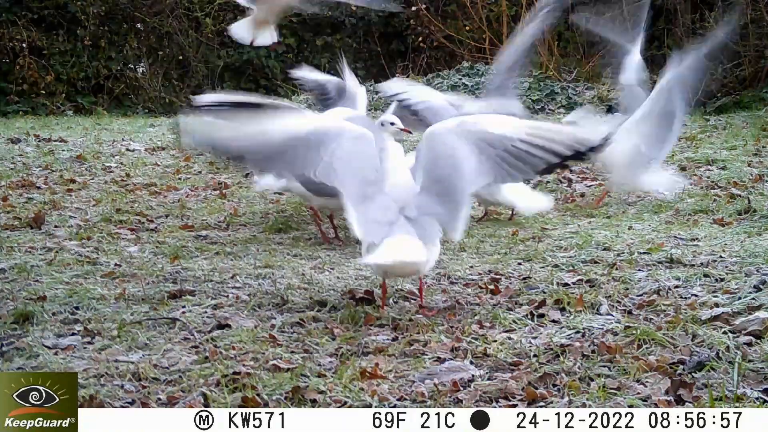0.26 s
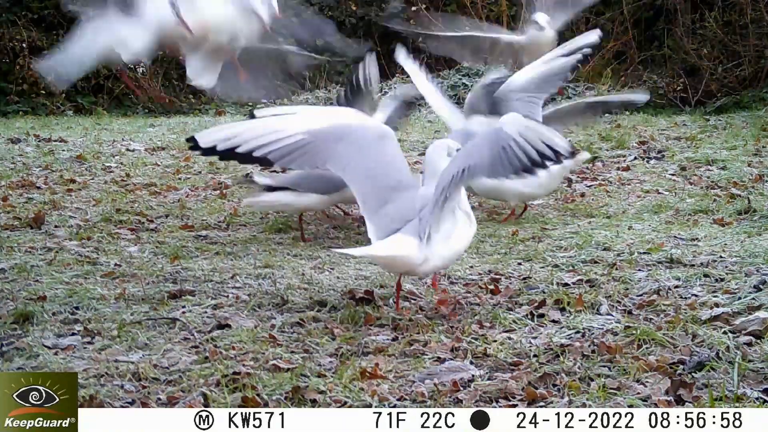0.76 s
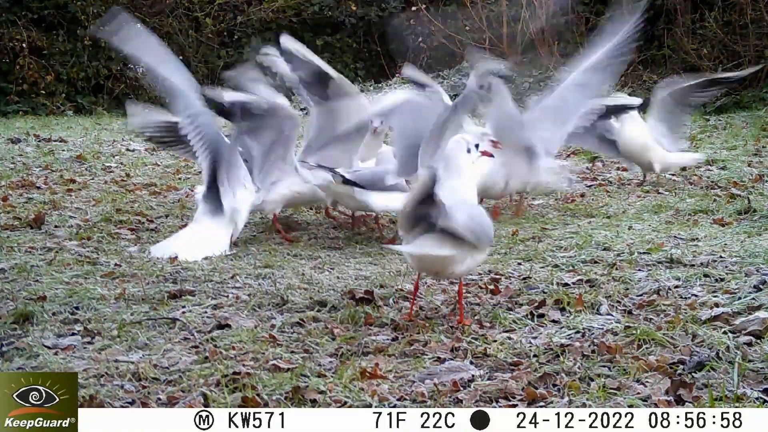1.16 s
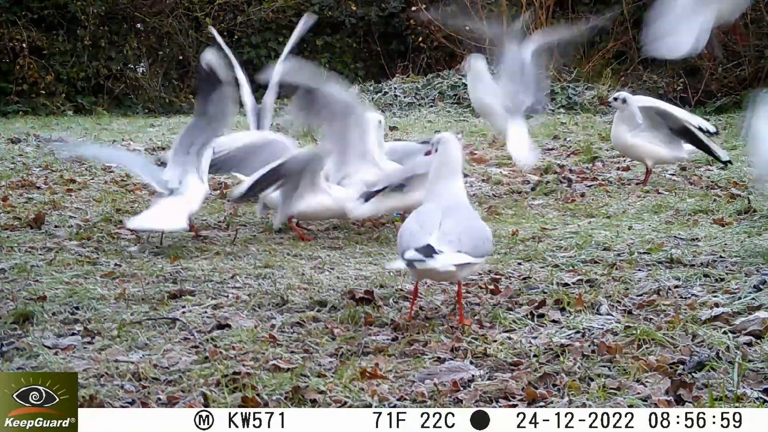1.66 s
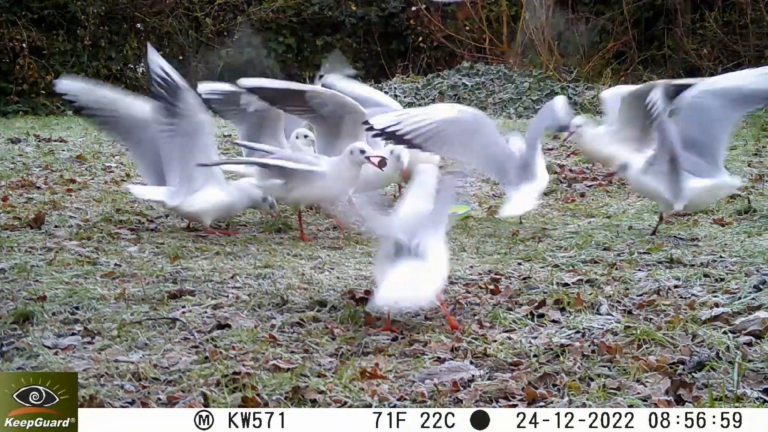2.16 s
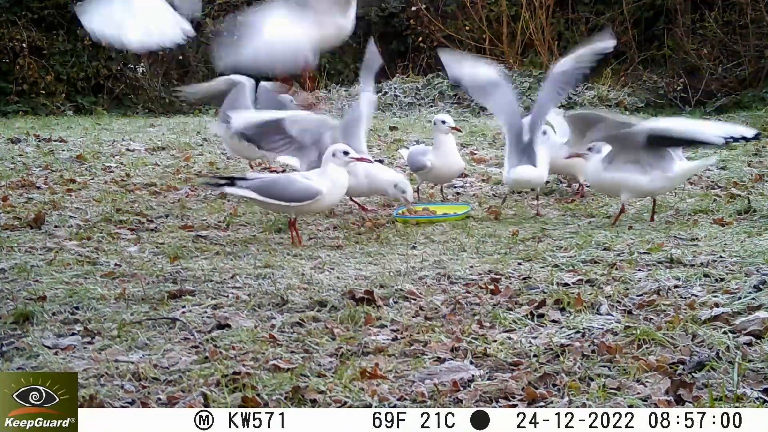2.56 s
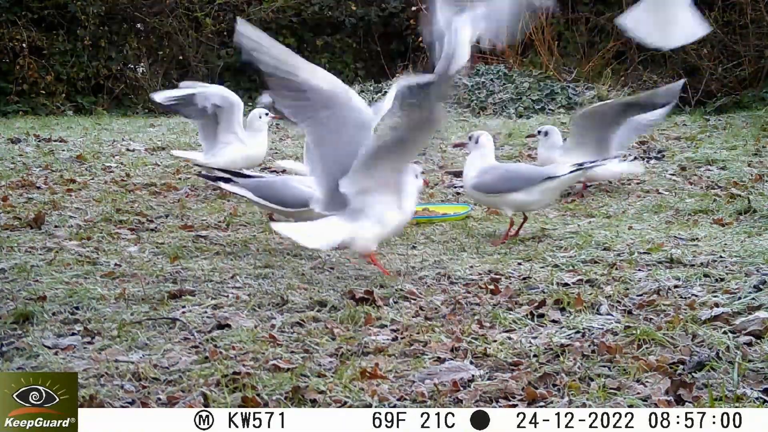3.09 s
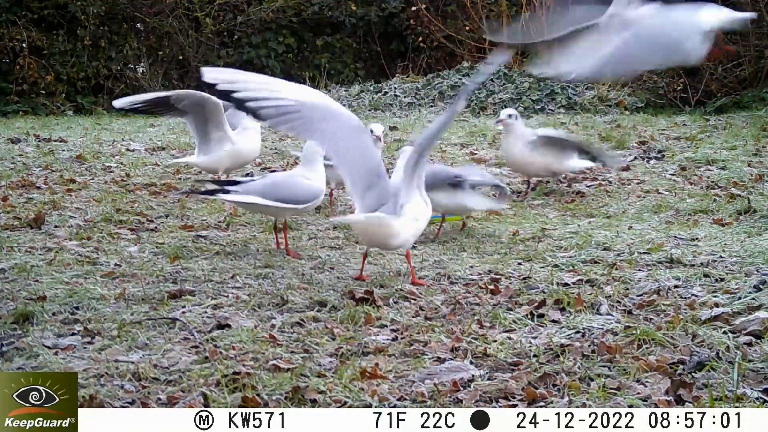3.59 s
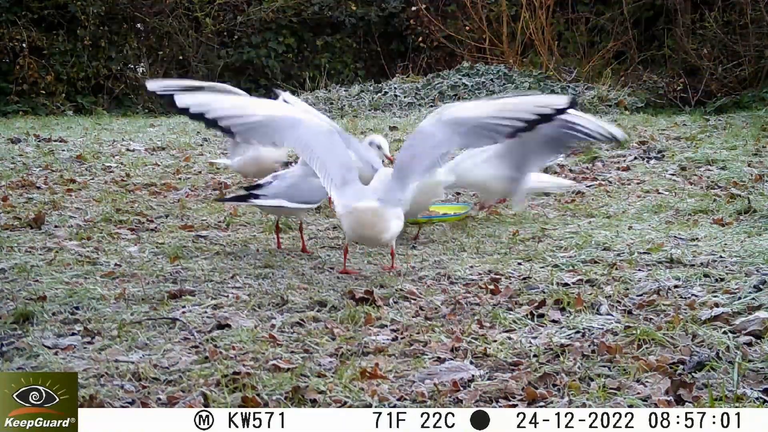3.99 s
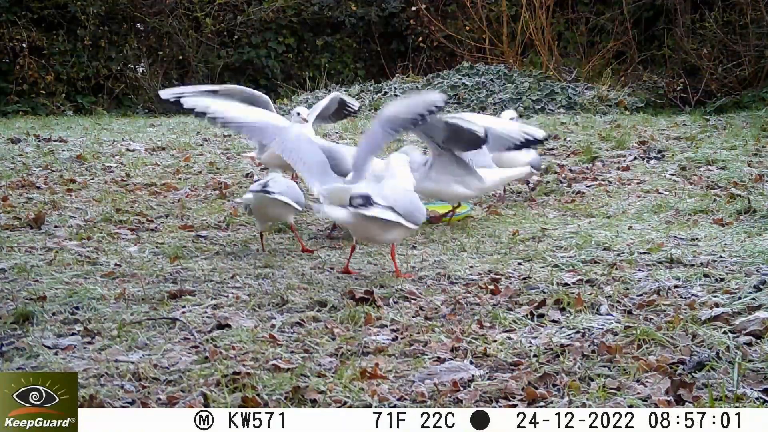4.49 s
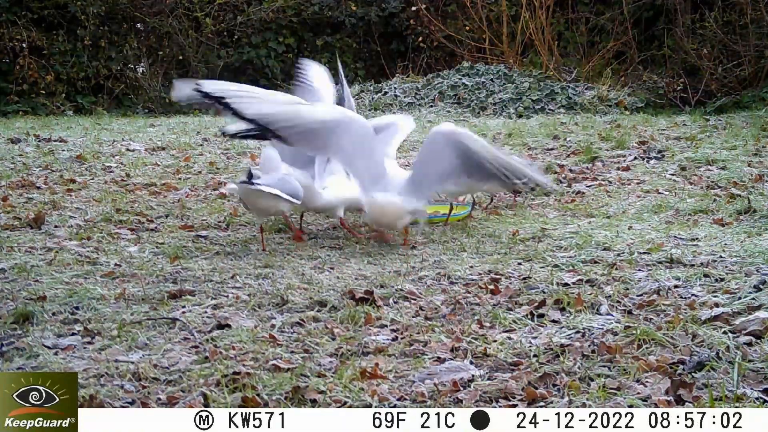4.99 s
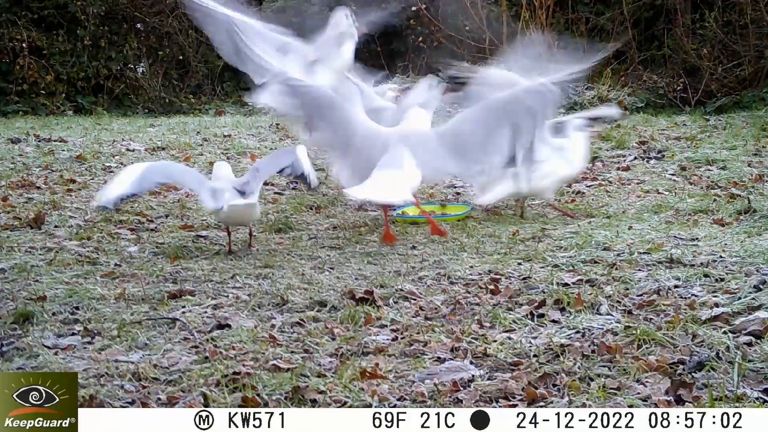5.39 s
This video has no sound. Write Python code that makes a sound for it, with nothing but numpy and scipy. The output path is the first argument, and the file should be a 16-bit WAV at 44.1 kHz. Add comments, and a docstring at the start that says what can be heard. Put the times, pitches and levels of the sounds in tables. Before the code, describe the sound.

Gulls jostle and flap close by, giving short rasping cries and nasal clucks amid wing claps and low gusts of air.

```python
"""Gulls at a food dish

Gulls jostle on a frosty lawn, a few steps from a small camera. Pulses and breath from the syrinx ring
through the bill as short rasping cries and lower nasal clucks; one bird whistles and one squeals.
Wings clap, swish and push air at the microphone, feet stir dead leaves, and a hedge answers faintly."""
import sys
import numpy as np
from scipy import signal
from scipy.fft import rfft, irfft, next_fast_len
from scipy.io import wavfile
from scipy.ndimage import map_coordinates

SR = 44100
rng = np.random.default_rng(int(sys.argv[2]) if len(sys.argv) > 2 else 0)


def unload_wav(signal):
    """Save mono or channel-first audio to the path in sys.argv[1] as 16-bit WAV at rate SR, clipped to [-1, 1]."""
    wavfile.write(
        sys.argv[1],
        SR,
        np.round(np.clip(np.atleast_2d(signal).T, -1, 1) * 32767).astype(np.int16),
    )


N = 249165
TOP_HZ = 7850  # band limit of the voices' harmonics and of the camera

# How busy the flock is. Each row: time in seconds, activity level in dB.
FLOCK_ACTIVITY = [(0.0, -44), (0.22, -52.5), (0.49, -51.5), (0.97, -45), (1.43, -45), (1.59, -47),
                  (1.79, -41), (2.22, -48), (2.42, -46.5), (2.8, -50.5), (3.15, -43.5), (3.45, -53),
                  (4.04, -56.5), (4.26, -53), (4.72, -59), (5.04, -57.5), (5.65, -46.5)]
# The soft wash of moving wings. Each row: frequency in Hz, relative level in dB.
SWISH_COLOUR = [(60, -10), (130, 6), (250, 1), (400, -3), (650, -4.5), (1100, -12), (2000, -27.5),
                (4000, -31.5), (8000, -31.5)]
# The crackle of feathers and dead leaves. Each row: frequency in Hz, relative level in dB.
RUSTLE_COLOUR = [(300, -33.5), (1200, 6.5), (2000, -1), (3500, -6), (5000, -13.5), (7500, -14)]
# Draught at the microphone, strong while birds flap close. Each row: time in seconds, level in dB.
DRAUGHT_LEVEL = [(0, -21.5), (.38, -25.5), (.56, -17.5), (.9, -28.5), (1.4, -33), (1.62, -25.5), (2.1, -32),
                 (2.47, -22.5), (2.9, -29), (3.45, -29.5), (3.7, -36.5), (4.2, -37), (4.6, -28.5),
                 (4.85, -34), (5.35, -28.5), (5.65, -24)]
# The draught's deep rumble. Each row: frequency in Hz, relative level in dB.
DRAUGHT_COLOUR = [(3, -38.5), (10, -2), (18, 8.5), (30, -13.5), (50, -13.5), (80, -20.5), (130, -36.5),
                  (300, -42), (800, -100)]
# Thumps from close downstrokes. Each row: centre in seconds, peak in dB, half length in seconds.
DOWNSTROKES = [(0.547, -12, 0.0048), (1.638, -20, 0.0086), (2.488, -20, 0.011), (2.671, -17.5, 0.014),
               (5.078, -26.5, 0.01), (5.302, -28, 0.01)]
# The featured wing strokes. Each row: centre in seconds, level in dB, pitch of the swish in Hz.
LOUD_STROKES = [(.015, -45.5, 488), (.115, -38, 765), (.408, -48, 820), (1.05, -42, 604),
                (1.195, -42.5, 503), (1.415, -42, 610), (1.497, -33.5, 1050), (1.738, -40, 444),
                (1.806, -36.5, 273), (1.822, -34, 846), (1.958, -39, 670), (2.132, -41, 710),
                (2.234, -41, 570), (2.341, -35, 604), (2.458, -38, 734), (2.531, -37.5, 586),
                (2.635, -41, 620), (3.092, -46.5, 246), (3.336, -43.5, 647), (4.443, -49.5, 805),
                (5.23, -49.5, 545), (5.302, -49.5, 388), (5.467, -46.5, 550)]
# Harsh cries. Each row: centre in seconds, half length in seconds, top pitch in Hz, rasp from 0 to 1,
# breath from 0 to 1, then the relative levels of the three lower formants in dB.
HARSH_CRIES = [(.137, 0.022, 848, 0.58, 0.24, -43.5, -32, -39),
               (.477, 0.016, 1008, 0.52, 0.062, -32, -33.5, -17.5),
               (.563, 0.023, 930, 0.33, 0.98, -39.5, -32.5, -36),
               (.871, 0.033, 991, 0.62, 0.57, -32, -25.5, -30.5),
               (1.105, 0.025, 909, 0.46, 0.93, -31.5, -36.5, -35.5),
               (1.232, 0.013, 1058, 0.61, 0.25, -28.5, -23.5, -31.5),
               (1.322, 0.018, 935, 0.34, 0.306, -31, -29, -30),
               (1.449, .027, 725, 0.58, 0.24, -30, -31, -40),
               (1.765, 0.035, 893, .75, 0.57, -33, -25.5, -33),
               (2.318, 0.023, 1002, 0.93, 0.34, -31, -26, -28),
               (2.559, 0.029, 891, 0.39, 0.91, -33, -30, -33),
               (2.828, .034, 783, .64, 0.7, -33.5, -33, -33),
               (3.208, 0.024, 729, 0.82, 0.29, -35.5, -31.5, -36),
               (3.856, 0.025, 592.5, 0.77, 0.55, -42, -45, -47.5),
               (4.329, 0.017, 697, 0.32, 0.43, -39, -42, -44),
               (5.005, 0.026, 848, 0.65, .9, -34.5, -38, -44),
               (5.041, 0.018, 420, .65, 1, -39.5, -39.5, -41.5),
               (5.546, 0.02, 903.6, 0.35, 0.73, -33.5, -30.5, -32)]
# Formants with the bill wide open. Each row: lower edge in Hz, upper edge in Hz.
OPEN_BILL = [(780, 1316), (1480, 1916), (2620, 3610), (6300, 7650)]
# Wing claps. Each row: start in seconds, level of the first 10 ms in dB, treble in dB (-14 is neutral).
WING_CLAPS = [(0.1886, -40, -12.5), (0.259, -44.5, -10.5), (0.593, -33.5, -13.5), (0.798, -36.5, -6.5),
              (0.8183, -36, -12), (1.001, -34, -9), (1.054, -35.5, -11), (1.5689, -29.5, -10.5),
              (2.4999, -39, -7), (2.7769, -36.5, -12.5), (2.895, -48, -3), (3.6738, -41.5, -6),
              (3.9679, -36, -6.5), (4.5565, -52.5, -4), (4.7794, -39.5, -11.5), (5.1402, -31, -20),
              (5.3892, -44.5, 0), (5.4632, -47, -7), (5.6039, -37.5, -12)]
# The body of a clap. Each row: frequency in Hz, relative level in dB.
WING_CLAP_COLOUR = [(60, -18.5), (250, -2.5), (500, 5), (1400, 5), (2500, -3.5), (4200, -17), (8000, -23.5)]
# The whistle's nearly flat line. Each row: time in seconds, pitch in Hz, level in dB.
WHISTLE_LINE = [(.99, 1430, -87), (1.02, 1450, -50), (1.07, 1436, -54), (1.1, 1485, -43.5),
                (1.15, 1440, -35.5), (1.17, 1430, -68)]
# The whistle's tone at its loudest. Each row: harmonic number, relative level in dB.
WHISTLE_HARMONICS = [(1, 0), (2, -14)]
# Nasal clucks. Each row: centre in seconds, half length in seconds, top pitch in Hz, rasp from 0 to 1,
# then the relative levels of the three formants in dB.
NASAL_CLUCKS = [(1.25, 0.013, 399.4, 0.47, -23, -38, -36.5), (1.379, 0.019, 392.4, .2, -24.5, -34.5, -44),
                (1.447, 0.03, 381.6, 0.41, -33, -53, -38.5), (1.935, 0.019, 348, .15, -35, -35, -53),
                (2.086, 0.015, 349.4, 0.08, -31.5, -36.5, -42.5),
                (2.996, 0.022, 381.5, .11, -28, -27, -41.5), (3.155, 0.022, 340, 0.24, -32, -31.5, -48),
                (3.284, .018, 360, 0.11, -27, -29.5, -32.5), (4.113, 0.016, 393, 0.71, -30, -35, -44),
                (4.228, 0.022, 387.7, 0.17, -26.5, -27.5, -34.5)]
# Formants with the bill nearly shut. Each row: lower edge in Hz, upper edge in Hz.
NARROW_BILL = [(940, 1293), (1400, 2040), (2740, 3195)]
# The squeal's arch. Each row: time in seconds, pitch in Hz, relative level in dB.
SQUEAL_LINE = [(3.095, 1530, -61), (3.14, 1700, -49), (3.16, 1752, -44), (3.195, 1757, -39),
               (3.22, 1738, -41), (3.25, 1695, -46), (3.28, 1630, -44), (3.303, 1545, -47),
               (3.325, 1420, -60)]
# The squeal's tone at its loudest. Each row: harmonic number, relative level in dB.
SQUEAL_HARMONICS = [(1, -16), (2, -1.5), (3, -6), (4, 4.5)]
# The tail from lawn and hedge. Each row: frequency in Hz, time to fall 60 dB in seconds.
HEDGE_DECAY = [(200, 0.37), (1500, 0.32), (7000, 0.24)]
# The notch of the camera's housing. Each row: frequency in Hz, gain in dB.
HOUSING_NOTCH = [(4200, 1.5), (4800, -4), (5600, -11), (6400, -1), (7100, 1)]


def amp(db):
    """Decibels to gain."""
    return 10 ** (np.asarray(db) / 20)


def unit(x):
    """x at rms 1."""
    return x / np.sqrt(np.mean(x ** 2) + 1e-20)


def along(points, hz):
    """Read (Hz, value) points on a log frequency axis."""
    freqs, values = np.transpose(points)
    return np.interp(np.log(hz + 1), np.log(freqs + 1), values)


def curves(rows):
    """One automation curve for each column after the time."""
    times, *columns = np.transpose(rows)
    return [np.interp(np.arange(N) / SR, times, column) for column in columns]


def wobble(rate, size=N):
    """A smooth random curve with rate knots a second."""
    return map_coordinates(rng.standard_normal(size + 4), [np.arange(size) * rate / SR])


def bandpass(x, edges_hz):
    """The band of x between two edges."""
    return signal.sosfilt(signal.butter(2, edges_hz, "bandpass", fs=SR, output="sos"), x)


def filtered(x, gain):
    """Equalise x with a gain over frequency."""
    size = next_fast_len(N + SR // 2)
    return irfft(rfft(x, size) * gain(np.fft.rfftfreq(size, 1 / SR)), size)[:N]


def noise(colour):
    """Coloured noise at rms 1."""
    return unit(filtered(rng.standard_normal(N), lambda hz: amp(along(colour, hz))))


def minimum_phase(gains):
    """The front-loaded impulse response of a gain spectrum."""
    cepstrum = irfft(np.log(gains))
    middle = len(cepstrum) // 2
    cepstrum[1:middle] *= 2
    cepstrum[middle + 1:] = 0
    return irfft(np.exp(rfft(cepstrum)))


def add(track, start_s, x):
    """Mix x into the track from start_s."""
    i = round(start_s * SR)
    x, i = x[max(-i, 0):], max(i, 0)
    track[i:i + len(x)] += x[:max(len(track) - i, 0)]


def flock_bed(swish_db=-1, rustle_db=-4.5, busy_db=-50, rustle_growth=0.58):
    """Wings stir the air; the busier the flock, the more feathers and dead leaves rustle in grains."""
    activity_db, = curves(FLOCK_ACTIVITY)
    swish = unit(noise(SWISH_COLOUR) * amp(2 * wobble(60)))
    rustle = unit(noise(RUSTLE_COLOUR) * amp(3 * wobble(500) + 3 * wobble(25)))  # grains and scuffles
    rustle_ride_db = busy_db + rustle_growth * (activity_db - busy_db)
    return amp(activity_db + swish_db) * swish + amp(rustle_ride_db + rustle_db) * rustle


def draught(surge_db=2, surges_per_s=14):
    """Air thrown by the wings buffets the microphone in surges; close strokes land as single thumps."""
    level_db, = curves(DRAUGHT_LEVEL)
    out = amp(level_db) * unit(noise(DRAUGHT_COLOUR) * amp(surge_db * wobble(surges_per_s)))
    for centre, db, half in DOWNSTROKES:
        u = (np.arange(N) / SR - centre) / half
        out += amp(db) * (1 - 2 * u ** 2) * np.exp(-u ** 2)
    return out


def soft_strokes(per_s=6, over_flock_db=4, usual_hz=570, pitch_scatter=0.25):
    """Rows for the filler wing strokes, unevenly spaced and as strong as the flock is busy."""
    slots = np.arange(0, N / SR, 1 / per_s)
    late, scatter_db, speed = rng.uniform(-1, 1, (len(slots), 3)).T
    times = slots + abs(late) / per_s
    levels = np.interp(times, *np.transpose(FLOCK_ACTIVITY)) + over_flock_db + scatter_db
    return list(zip(times, levels, usual_hz * np.exp(pitch_scatter * speed)))


def wing_strokes(swell_cycles=6.8, spread=1.36, feather_db=-11, feather_hz=(900, 3000)):
    """A passing wing sheds eddies in a broad band, with a brush of feathers on top."""
    out, t = np.zeros(N), np.arange(-SR // 14, SR // 14) / SR
    for centre, db, hz in list(LOUD_STROKES) + soft_strokes():
        swell = np.exp(-(t * hz / swell_cycles) ** 2 / 2)  # a fast wing is higher and briefer
        eddies = unit(bandpass(rng.standard_normal(len(t)), [hz / spread, hz * spread]))
        feathers = unit(bandpass(rng.standard_normal(len(t)), feather_hz))
        swish = swell * (eddies + amp(feather_db) * feathers)
        add(out, centre + t[0], amp(db) * swish * np.linalg.norm(swell) / np.linalg.norm(swish))
    return out


def syrinx(pitch, effort, rasp, breath, rasp_hz, jitter, waver, rolloff):
    """The gull's voice: pulses and breath, chopped and bent into a rasp by an uneven flutter."""
    size = len(pitch)
    flutter_hz = rasp_hz * (1 + 0.25 * wobble(110, size))
    flutter = np.cos(2 * np.pi * (np.cumsum(flutter_hz) / SR + rng.random()))
    # at low pressure, at both ends of a call, the membranes lose their regular beat
    unsteady = waver + jitter * rasp * (1 + 1.62 * (1 - effort))
    pitch = pitch * np.exp(unsteady * wobble(606, size) + 0.034 * rasp * flutter)
    phase = 2 * np.pi * np.cumsum(pitch) / SR
    k = np.arange(1, 25)[:, None]
    pulses = np.sum(np.cos(k * phase) * (k * pitch < TOP_HZ) / k ** rolloff, axis=0)
    shimmer_db = 4 * rasp * wobble(801.3, size)
    pulses = unit(pulses * amp(shimmer_db))
    # turbulent air escapes in uneven spurts
    hiss = unit(rng.standard_normal(size) * (1 + np.cos(phase)) * amp(3 * wobble(604, size)))
    chop = 1 + 0.71 * rasp * flutter
    return (np.sqrt(1 - breath) * pulses + np.sqrt(breath) * hiss) * chop


def calls(rows, formants, trim_db, steepness, upper_squeeze, climb_s, sag_s, fade_ratio, **voice):
    """The syrinx rings the formants of throat and bill; pitch and loudness arch together."""
    out, t = np.zeros(N), np.arange(-SR // 14, SR // 14) / SR
    for centre, half, top_hz, rasp, breath, *levels in rows:
        effort = np.exp(-np.abs(t / np.where(t < 0, half, fade_ratio * half)) ** steepness)
        # an octave down at climb_s before the top and at sag_s after it
        pitch = top_hz / (1 + (t / np.where(t < 0, climb_s, sag_s)) ** 2)
        source = syrinx(pitch, effort, rasp, breath, **voice)
        for k, (band, db) in enumerate(zip(formants, levels)):
            # the upper formants need more effort to speak
            formant = bandpass(source, band) * effort ** (upper_squeeze ** (k - 1))
            formant *= np.linalg.norm(effort) / np.linalg.norm(formant)
            add(out, centre + t[0], amp(db + trim_db) * formant)
    return out


def cries(bite_db=-45.5, loud_db=-26, bite_growth=1.63):
    """Rasping cries through a wide open bill; the harder the cry, the more a fourth formant bites."""
    # the fourth formant's level follows the second's
    rows = [(*row, bite_db + bite_growth * (row[-2] - loud_db)) for row in HARSH_CRIES]
    return calls(rows, OPEN_BILL, trim_db=-3, steepness=2.16, upper_squeeze=1.16,
                 climb_s=0.047, sag_s=0.05, fade_ratio=0.96,
                 rasp_hz=91.27, jitter=0.04, waver=0.0062, rolloff=0.11)


def wing_claps(feather_gain=0.055, rise_s=0.00033, t60_s=0.072, neutral_treble_db=-14):
    """One wing hits another: a pressure snap, then the feathers clatter shut."""
    out, t = np.zeros(N), np.arange(SR // 10) / SR
    hz = np.fft.rfftfreq(2048, 1 / SR)
    treble_shelf = along([(1500, 0), (4000, 1)], hz)
    clatter = feather_gain * amp(-60 * t / t60_s) * (1 - np.exp(-t / rise_s))
    for start, db, treble_db in WING_CLAPS:
        blow = clatter * rng.standard_normal(len(t))
        blow[0] = 1  # the snap
        colour_db = along(WING_CLAP_COLOUR, hz) + (treble_db - neutral_treble_db) * treble_shelf
        clap = signal.fftconvolve(blow, minimum_phase(amp(colour_db)))
        add(out, start, amp(db) * clap / np.std(clap[:SR // 100]))
    return out


def thin_call(line, harmonics, waver, brighten=0.4, shimmer_db=2, fade_s=0.007):
    """A whistle or squeal: a thin, wavering note that brightens as it gets louder."""
    pitch, db = curves(line)
    t = np.arange(N) / SR
    gate = np.clip(np.minimum(t - line[0][0], line[-1][0] - t) / fade_s, 0, 1)
    phase = 2 * np.pi * np.cumsum(pitch * (1 + waver * wobble(300))) / SR
    tilt_db = brighten * (db - db.max())
    tone = sum(amp(level + (k - 2) * tilt_db) * np.sin(k * phase) for k, level in harmonics)
    return np.sqrt(2) * gate * amp(db + shimmer_db * wobble(200)) * tone


def clucks(breath=0.06):
    """Lower, cleaner calls through a nearly shut bill, sagging as they end."""
    rows = [(*row[:4], breath, *row[4:]) for row in NASAL_CLUCKS]
    return calls(rows, NARROW_BILL, trim_db=-4.5, steepness=2.9, upper_squeeze=2.06,
                 climb_s=0.085, sag_s=0.072, fade_ratio=1.44,
                 rasp_hz=70, jitter=0.031, waver=0.01, rolloff=0.77)


def garden(x, wet_db=-16):
    """Lawn and hedge scatter a faint, short tail behind the direct sound."""
    hz, t, spectrum = signal.stft(rng.standard_normal(SR // 2), SR, nperseg=256)
    decay = amp(-60 * t / along(HEDGE_DECAY, hz)[:, None])
    _, tail = signal.istft(spectrum * decay, SR, nperseg=256)
    tail = np.pad(tail / np.linalg.norm(tail), (SR // 200, 0))  # 5 ms pre-delay
    return x + amp(wet_db) * signal.fftconvolve(x, tail)[:N]


def scene():
    """The mono mix: a dry bed of flock and draught, with voices, claps and strokes in the garden."""
    squeal = thin_call(SQUEAL_LINE, SQUEAL_HARMONICS, waver=0.0047)
    whistle = thin_call(WHISTLE_LINE, WHISTLE_HARMONICS, waver=0.0026)
    bed = flock_bed() + draught()
    birds = cries() + clucks() + whistle + squeal + wing_claps() + wing_strokes()
    return (bed + garden(birds))[None]


def record(dry):
    """The camera's housing notches the treble, and its band limit cuts off the top."""
    def response(hz):
        return amp(along(HOUSING_NOTCH, hz)) * np.clip((TOP_HZ - hz) / 200 + 0.5, 0, 1)
    return filtered(dry[0], response)[None]


dry = scene()
out = record(dry)
unload_wav(out)
```